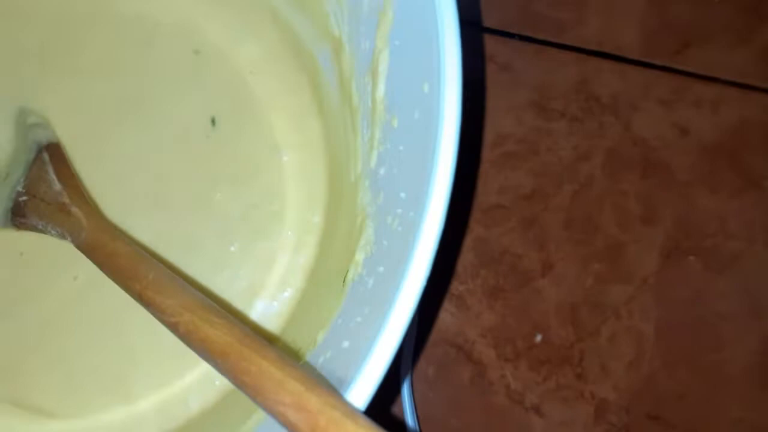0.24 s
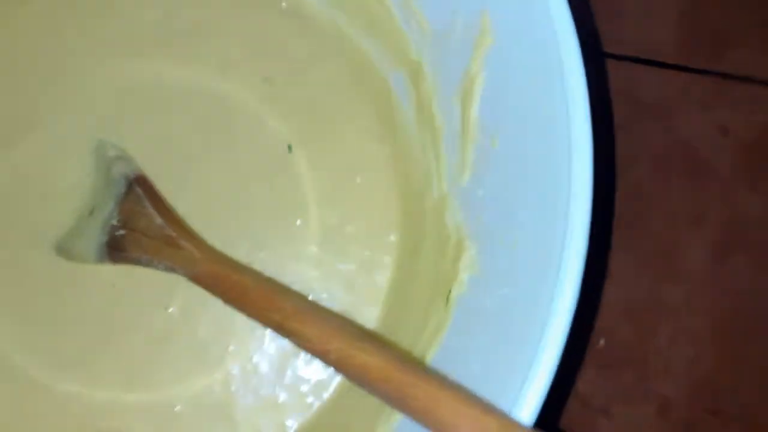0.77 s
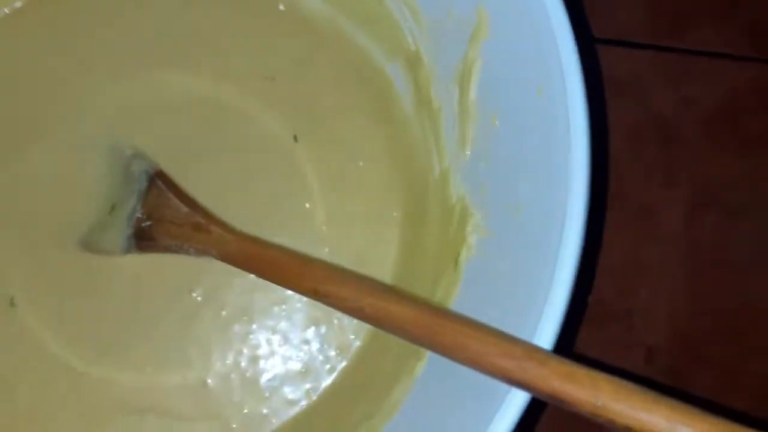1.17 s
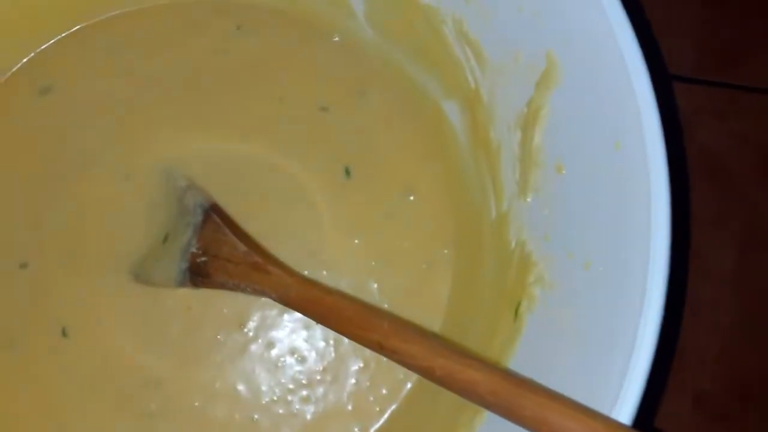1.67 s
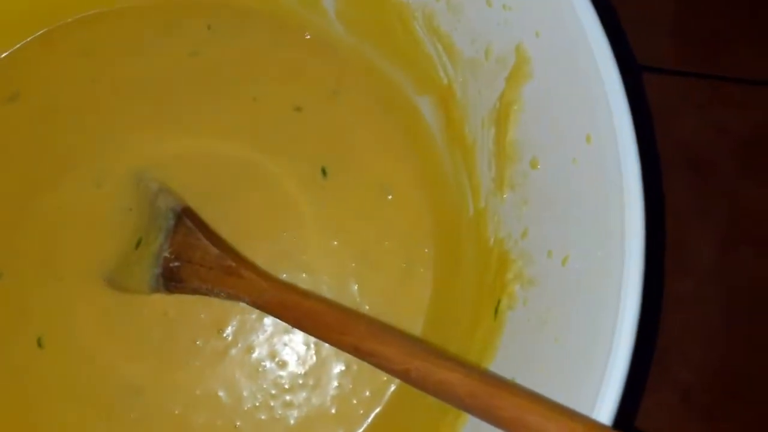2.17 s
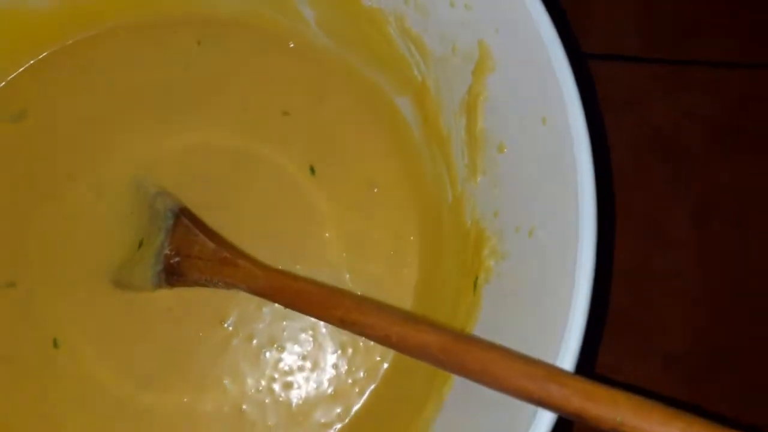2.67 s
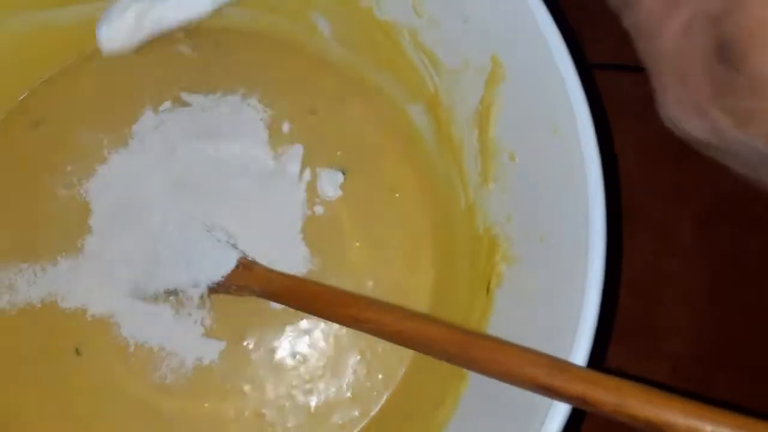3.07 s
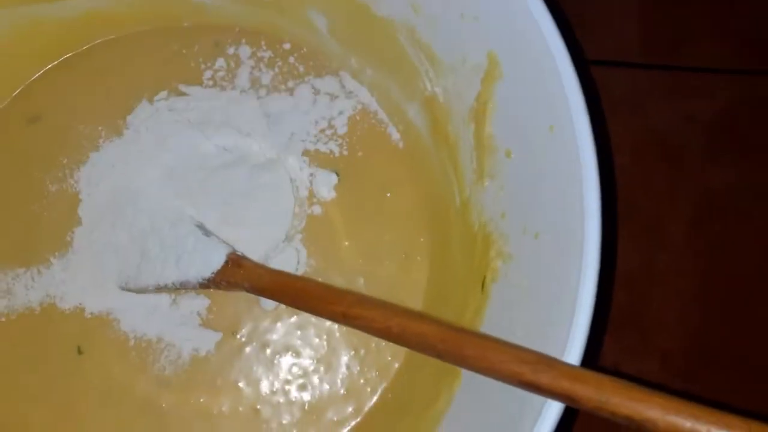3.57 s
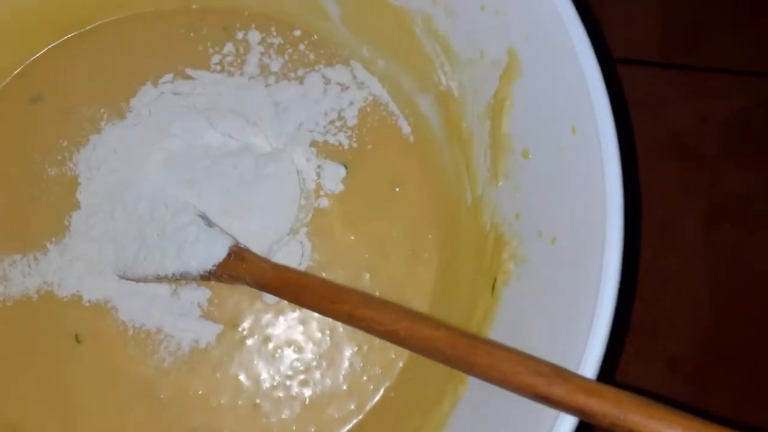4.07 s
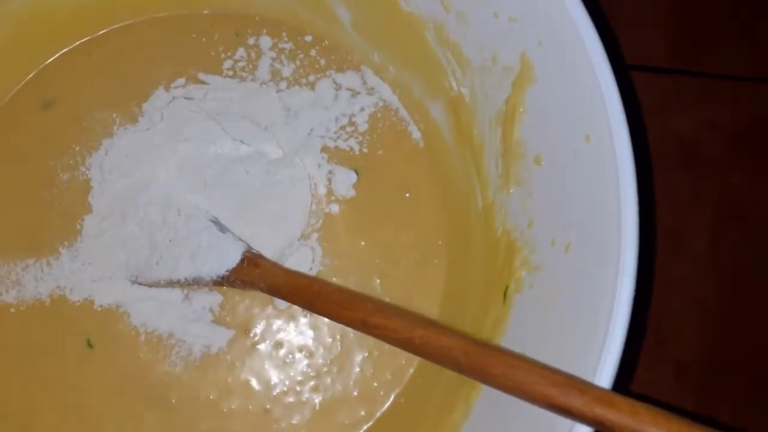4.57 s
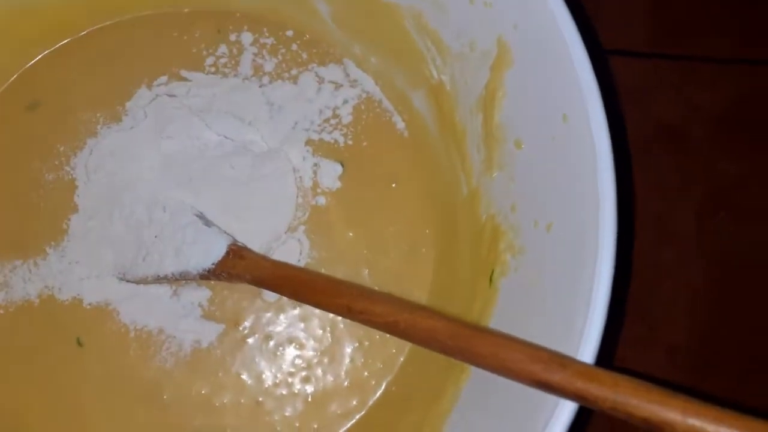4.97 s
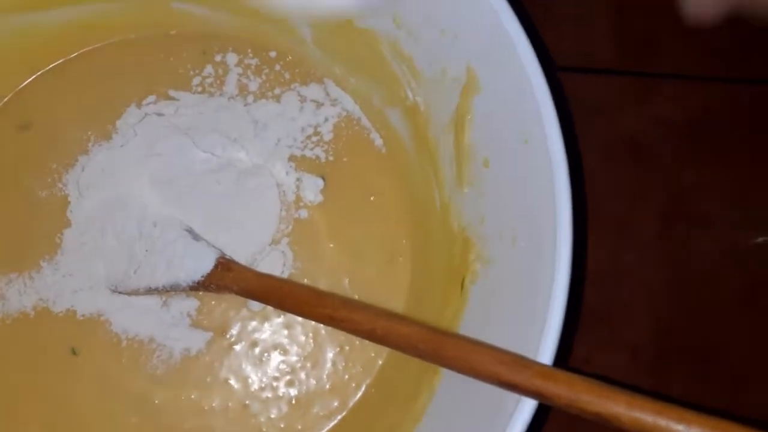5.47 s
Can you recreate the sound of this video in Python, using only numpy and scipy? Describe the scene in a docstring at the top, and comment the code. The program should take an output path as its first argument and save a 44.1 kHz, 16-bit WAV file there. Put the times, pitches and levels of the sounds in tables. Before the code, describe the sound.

A faint rustle and a soft spoon tap open, followed by two quick knocks on a kitchen table. Short crinkles of a flour bag come and go, drawn out by the room's echo. Midway, a spoon clicks several times against a batter-filled plastic bowl close by. The bag rustles again, more loudly, and the spoon taps twice more. A low hum and rumble sit underneath throughout.

```python
"""Flour is spooned into a plastic bowl of batter in a hard-walled kitchen, over a low hum and rumble.
The flour bag gives a brief rustle, a spoon taps the bowl lightly, and something is put down with two
knocks. After a pause the bag crinkles in short strokes that the room draws out. Around 3 s the spoon
taps several times close by, briefly ringing the batter-damped bowl and bouncing back.
More rustles follow, and two last taps come near the end."""
import sys
import numpy as np
from scipy import signal
from scipy.fft import rfft, irfft
from scipy.io import wavfile

SR = 44100
rng = np.random.default_rng(int(sys.argv[2]) if len(sys.argv) > 2 else 0)


def wav_out(sig):
    """Save sig, one row per channel (or a flat mono array), as 16-bit PCM at SR to the path in sys.argv[1]."""
    wavfile.write(sys.argv[1], SR, np.round(np.clip(np.atleast_2d(sig).T, -1, 1) * 32767).astype(np.int16))


N = 252384

# how long the kitchen echoes; a fade time is a fall of 60 dB: (pitch [Hz], fade time [s])
KITCHEN_FADE = [(150, 0.52), (400, 0.56), (1000, 0.8), (2800, 0.85), (7000, 0.69), (15000, 0.49)]
# how alike left and right sound; the highest treble is heard in the centre:
# (pitch [Hz], likeness [1 or more is fully alike])
SIDE_LIKENESS = [(60, 1.5), (150, 0.76), (300, 0.91), (640, 0.4), (1300, 0), (6000, 0.02), (10000, 1.3),
                 (15000, 1.1)]
# which way the sound leans: (pitch [Hz], left minus right [dB])
ROOM_BALANCE = [(60, -3), (200, -2.5), (700, 0), (1300, -4), (2400, -4), (8000, -4.5), (14000, 2.5)]
# echoes off the bowl's wall and the table top: (delay [s], level [dB])
NEAR_ECHOES = [(.00325, -31.5), (.0043, -16.5), (.0079, -15)]

# the tone of the steady air: (pitch [Hz], relative level [dB])
AIR_TONE = [(12, -40), (20, -21.5), (101, -0.5), (158, -4.5), (204, -17.5), (310, -5.5), (472, -11.5),
            (698, -23.5), (949, -22), (1150, -30.5), (1960, -31), (3740, -44), (5850, -44.5), (7310, -42),
            (16000, -52.5)]
# which way the air leans: (pitch [Hz], left minus right [dB])
AIR_SIDES = [(100, -2), (500, -5), (800, -7), (1100, -13), (1800, -13.5), (3500, -2), (8000, -10),
             (11000, 1)]
# low resonances that make the rumble: (pitch [Hz], width [Hz], level [dB])
RUMBLE_NOTES = [(59, 7.7, -70.5), (96.5, 8.8, -67.5), (113.9, 4.6, -59), (161.4, 34, -63), (260, 34, -64.5),
                (314, 110, -57)]

# strokes of the flour bag: (time [s], rough length [s], relative level [dB], rasp over body [dB],
# fizz over body [dB], crease pitch [Hz])
BAG_STROKES = [(0, 0.0011, -42, -10.5, -6.5, 448), (1.59, 0.016, -61, -22, -26, 1170),
               (2.366, 0.025, -44.5, -18.5, -9.5, 860), (2.625, 0.022, -35, -21.5, -18, 2860),
               (2.846, 0.018, -40, -11.5, -16, 3920), (3.534, 0.033, -40.5, -6.5, -10.5, 1230),
               (3.841, 0.018, -39, -8.5, -11, 1396), (4.255, 0.027, -82, -18.5, 14, 8400),
               (4.815, 0.4, -56.5, -5.5, -5.5, 2100), (4.95, 0.011, -32, -19, -19.5, 1640),
               (5.124, 0.012, -28, -9.5, -11.5, 1544), (5.256, 0.0047, -27, -9.5, -12, 1540),
               (5.646, 0.015, -45.5, -8.5, -16, 960)]
# the bag's low body, higher rasp and top fizz: (low edge [Hz], high edge [Hz], fade time [s])
BAG_LAYERS = [(85.5, 2640, 0.91), (2942, 5310, 0.94), (6300, 13500, 0.75)]
# the tone of the bag from across the kitchen: (pitch [Hz], relative level [dB])
BAG_TONE = [(105, -11.5), (195, -21.5), (255, -6.5), (345, 1.5), (420, -6.5), (730, -8.5), (900, -4),
            (1070, -10.5), (1220, -10.5), (1950, -7), (3100, -16.5), (8100, -20), (9600, -34),
            (15000, -30.5)]

# the spoon on the bowl: (time [s], strength [dB], relative tick [dB], bounce over tap [dB])
SPOON_TAPS = [(0.119, -16, -12.5, -12.5), (2.9782, -14, 2.5, -1), (3.2488, 2, 1, -8.5),
              (3.3908, 2, 4, -8.5), (3.435, -14, -23, -14), (5.5937, -3.5, 0, -15), (5.652, -23, 8, -23)]
# notes of the batter-damped bowl: (pitch [Hz], level [dB], fade time [s], left minus right [dB])
BOWL_NOTES = [(83, -36.5, 0.17, 0), (112.7, -37, 0.16, -3), (167.4, -32, 0.25, -3.5), (251, -21, 0.049, -3),
              (348.5, -20, 0.055, -4), (491, -17.5, 0.046, -2), (609.5, -16.5, 0.028, -1.5),
              (725, -17, .015, -10.5), (1200, -13.5, 0.02, -9), (1500, -20, 0.024, -7.5),
              (1810, -8, 0.021, -25), (2180, -6.5, 0.012, -20), (2527, -14, .014, -6.5)]
# the tone of the spoon's tick: (pitch [Hz], relative level [dB])
TICK_TONE = [(300, -31), (2500, 0.5), (5000, -3), (8500, -7), (10000, -23), (14000, -8), (16000, -31)]
# the room's share of a tap: (pitch [Hz], relative level [dB])
TAP_ECHO = [(80, -1.5), (170, -8), (300, 0), (550, -9.5), (800, -3.5), (1200, -12), (1500, -7.5),
            (2000, -14.5), (2600, -12), (3200, -4), (5000, -7), (9000, -3), (15000, -16)]

# knocks on the table: (time [s], strength [dB], treble cut-off [Hz], relative click [dB])
TABLE_KNOCKS = [(0.3187, -0.5, 4570, 0.5), (0.4844, 5.5, 3200, -5.5)]
# notes of the table and what lands on it: (pitch [Hz], level [dB], fade time [s], left minus right [dB])
TABLE_NOTES = [(151, -31, 0.15, -2.5), (303.7, -17, 0.036, -4), (329.7, -14.5, 0.042, -5),
               (460, -21, 0.026, -1.5), (634, -19, 0.011, -2.5), (830, -27.5, 0.039, 4.5),
               (994, -26.5, 0.03, 10.5), (1206, -24, 0.0084, 2), (1440, -33, 0.013, -2),
               (1800, -16.5, 0.0048, -19.5), (2070, -13.5, 0.0091, -30.5)]
# the tone of a knock's click: (pitch [Hz], relative level [dB])
CLICK_TONE = [(200, -9), (1000, -0.5), (2500, -0.5), (4500, -5.5), (6000, -11.5), (8500, -14.5),
              (10000, -24.5), (16000, -29.5)]
# the room's share of a knock: (pitch [Hz], relative level [dB])
KNOCK_ECHO = [(80, -12.5), (160, -3.5), (350, -7), (600, -1.5), (1000, -1.5), (1500, -5), (2100, -5),
              (4000, 1), (9000, -5), (15000, 5)]

TOP_HZ = 15950  # upper edge of the treble


def amp(db):
    """Turns decibels into a number to multiply by."""
    return 10 ** (np.asarray(db) / 20)


def evened(x):
    """Scales a signal to an average power of 1."""
    return x / np.sqrt(np.mean(x ** 2) + 1e-20)


def read(points, hz):
    """Looks up a table at any pitch, sliding between its rows on a musical scale."""
    pitch, value = np.transpose(points)
    return np.interp(np.log(hz + 1), np.log(pitch + 1), value)


def add(mix, start_s, sound):
    """Mixes a stereo sound in at the given time."""
    part = mix[:, max(round(start_s * SR), 0):]
    part[:, :sound.shape[1]] += sound[:, :part.shape[1]]


def band(hz, low_hz, high_hz, order=12):
    """A curve that keeps the pitches between two edges; a higher order cuts more steeply."""
    return 1 / np.sqrt((1 + (low_hz / (hz + 1)) ** order) * (1 + (hz / high_hz) ** order))


def wander(size, rate_hz):
    """A smooth random wobble, mostly slower than rate_hz."""
    hz = np.fft.rfftfreq(size, 1 / SR)
    return evened(irfft(rfft(rng.standard_normal(size)) / (1 + (hz / rate_hz) ** 4), size))


def stereo_noise(size, balance):
    """Noise spread between left and right, given as pitches and a spectrum for each side."""
    hz = np.fft.rfftfreq(size, 1 / SR)
    left, unrelated = rfft(rng.standard_normal((2, size)))
    likeness = np.clip(read(SIDE_LIKENESS, hz), -1, 1)
    right = likeness * left + np.sqrt(1 - likeness ** 2) * unrelated
    lean = amp(read(balance, hz) / 2)
    # small nearby surfaces reflect only short waves and ripple the treble
    ripple = sum(amp(db) * np.cos(2 * np.pi * hz * delay_s) for delay_s, db in NEAR_ECHOES)
    treble = hz ** 2 / (hz ** 2 + 1000 ** 2)
    return hz, (1 + ripple * treble) * np.array([left * lean, right / lean])


def background():
    """Faint, even air, a lumpy low rumble that dips once, and a steady mains hum."""
    t = np.arange(N) / SR
    hz, noise = stereo_noise(N, AIR_SIDES)
    air_spectrum = noise * amp(read(AIR_TONE, hz))
    hiss_size = np.std(irfft(air_spectrum.mean(0) * band(hz, 600, TOP_HZ), N))
    air = irfft(air_spectrum, N) / hiss_size * amp(-71.5)  # the hiss above 600 Hz sets the air's level
    rumble = np.zeros((2, N))
    lumps_db = 1.4 * wander(N, rate_hz=14)
    for note_hz, width_hz, db in RUMBLE_NOTES:
        hz, noise = stereo_noise(N, ROOM_BALANCE)
        note = evened(irfft(noise / (1 + (1.83 * (hz - note_hz) / width_hz) ** 2), N))
        rumble += note * amp(db + lumps_db * min(width_hz / 45, 1))  # wide notes follow the lumps most
    dip_db = -5.5 * np.exp(-((t - 4.55) / 0.35) ** 2)  # deepest at 4.55 s
    hum_hz, hum_db = 58.8, -62.5
    sides_db = read(ROOM_BALANCE, hum_hz) * np.array([[.5], [-.5]])
    hum = evened(np.sin(2 * np.pi * hum_hz * t)) * amp(hum_db + sides_db)
    return air + rumble * amp(dip_db) + hum


def bag_rustles():
    """Each stroke is a dense crush of crinkles with one note of the creased bag; the room draws it out."""
    out, t = np.zeros((2, N)), np.arange(SR) / SR
    for start_s, length_s, level_db, rasp_db, fizz_db, crease_hz in BAG_STROKES:
        hz, noise = stereo_noise(SR, ROOM_BALANCE)
        crease_peak = 1 / (1 + ((hz / crease_hz - 1) / 0.037) ** 2)
        crease_db = 13.5 + .48 * rasp_db  # the note stands out more in a raspier stroke
        spectrum = noise * amp(read(BAG_TONE, hz) + crease_db * crease_peak)
        crush = t / length_s * np.exp(-1.8 * t / length_s)
        grain_db = 0.39 * wander(SR, rate_hz=110)
        for (low_hz, high_hz, fade_s), layer_db in zip(BAG_LAYERS, (0, rasp_db, fizz_db)):
            crinkles = evened(irfft(spectrum * band(hz, low_hz, high_hz, order=18), SR))
            # the room stores the crush's energy and lets it leak away
            kept_per_sample = np.exp(-2 * np.log(1000) / (fade_s * SR))
            energy = signal.lfilter([1], [1, -kept_per_sample], crush)
            swell = np.sqrt(energy / energy.max())
            add(out, start_s, crinkles * swell * amp(level_db + layer_db + grain_db - 1.64))
    return out


def blow(notes, contact_hz, click_tone, click_db, click_fade_s, click_left_db):
    """A struck thing rings and clicks; gives that sound and the power it sends the room at each pitch."""
    t = np.arange(SR) / SR
    ring = np.zeros((2, SR))
    for k, (hz, db, fade_s, left_db) in enumerate(notes):
        note = np.sin(2 * np.pi * hz * t) * amp(-60 * t / fade_s)
        # neighbouring notes move the struck spot in opposite directions
        ring += (-1) ** k * amp([[db + left_db], [db]]) * note
    # a soft contact barely wakes the notes above contact_hz
    ring = signal.sosfilt(signal.butter(6, min(contact_hz, SR / 3), fs=SR, output="sos"), ring)
    hz, noise = stereo_noise(SR, ROOM_BALANCE)
    tone = amp(read(click_tone, hz) + click_db)
    fade = amp(-60 * t / click_fade_s)
    click = irfft(noise * tone, SR) * fade * amp([[click_left_db], [0]])
    power = abs(rfft(ring.mean(0))) ** 2 + tone ** 2 * np.sum(fade ** 2) / 2
    return ring + click, power


def kitchen_echo(power, share):
    """The hard walls return a blow as a wash that builds quickly; each pitch fades at its own rate."""
    hz, noise = stereo_noise(SR, ROOM_BALANCE)
    wash = irfft(noise * np.sqrt(power) * amp(read(share, hz)), SR)
    band_hz, t, slices = signal.stft(wash, SR, nperseg=256)
    fade_s = read(KITCHEN_FADE, band_hz)[:, None]
    same_energy = np.sqrt(2 * np.log(1000) / (fade_s * SR))  # a longer fade starts quieter
    fade = amp(-60 * t / fade_s) * same_energy
    tail = signal.istft(slices * fade, SR, nperseg=256)[1][:, :SR]
    build_up = 1 - np.exp(-(np.arange(SR) / SR / .006) ** 2)
    return tail * build_up


def lagged(sound, lag_s):
    """The sound reaches the right side a moment after the left."""
    t = np.arange(sound.shape[1]) / SR
    right = np.interp(t - round(lag_s * SR) / SR, t, sound[1], left=0)
    return np.array([sound[0], right])


def tap(db, tick_db, brightness):
    """One touch of the spoon on the bowl, with its echo; a harder blow is shorter and so brighter."""
    contact_hz = brightness * 2676 * amp(.4 * db)
    hit, power = blow(BOWL_NOTES, contact_hz, TICK_TONE, tick_db - 25.5,
                      click_fade_s=0.017, click_left_db=-11.5)
    return amp(db) * (lagged(hit, lag_s=.00022) + amp(-1) * kitchen_echo(power, TAP_ECHO))


def spoon_taps():
    """The spoon strikes the bowl close by and bounces, landing again more softly."""
    out = np.zeros((2, N))
    for start_s, db, tick_db, bounce_db in SPOON_TAPS:
        add(out, start_s, tap(db, tick_db, brightness=1))
        bounce_s = .018 * amp(0.21 * db)  # later after a harder blow
        add(out, start_s + bounce_s, tap(db + bounce_db, tick_db - 9.5, brightness=0.77))
    # the spoon's edge glances off the rim once, almost all tick
    add(out, start_s=3.26, sound=tap(db=-20.5, tick_db=23, brightness=0.85))
    return out


def knock(db, contact_hz, click_db):
    """One edge meets the table and sets the kitchen ringing."""
    hit, power = blow(TABLE_NOTES, contact_hz, CLICK_TONE, click_db - 14.5,
                      click_fade_s=0.034, click_left_db=-1.5)
    return amp(db) * (lagged(hit, lag_s=0.00044) + kitchen_echo(power, KNOCK_ECHO))


def table_knocks():
    """In each knock one edge lands, then the other follows, weaker but with a bigger share of click."""
    out = np.zeros((2, N))
    edge_gap_s = 0.0049
    for start_s, db, contact_hz, click_db in TABLE_KNOCKS:
        add(out, start_s, knock(db, contact_hz, click_db))
        add(out, start_s + edge_gap_s, knock(db - 20.5, contact_hz=2750, click_db=click_db + 14))
    return out


def scene():
    """Everything heard at the bowl."""
    return background() + bag_rustles() + spoon_taps() + table_knocks()


def record(dry):
    """Trims away the deepest bass and the highest treble."""
    bass_cut = signal.butter(4, 44, "highpass", fs=SR, output="sos")
    treble_cut = signal.firwin(511, TOP_HZ, window=("kaiser", 9), fs=SR)
    return signal.oaconvolve(signal.sosfilt(bass_cut, dry), treble_cut[None], "same")


dry = scene()
out = record(dry)
wav_out(out)
```